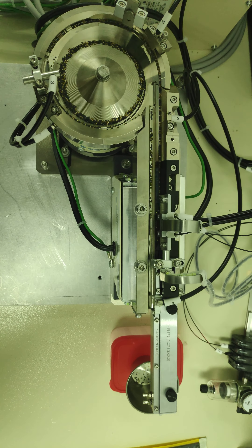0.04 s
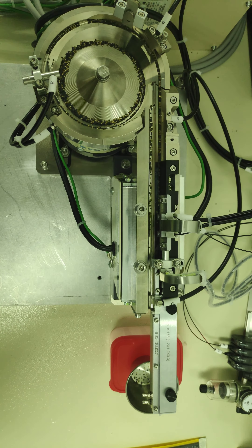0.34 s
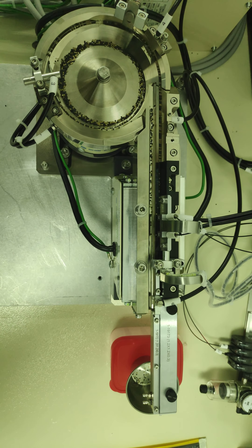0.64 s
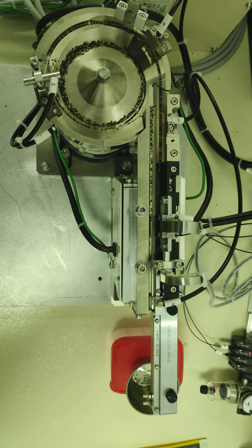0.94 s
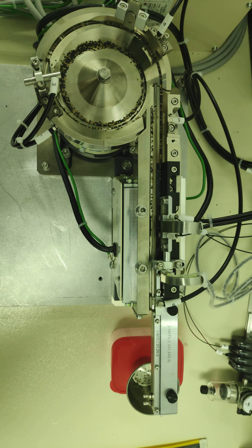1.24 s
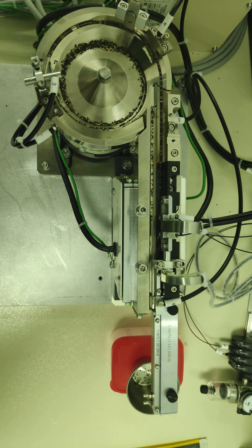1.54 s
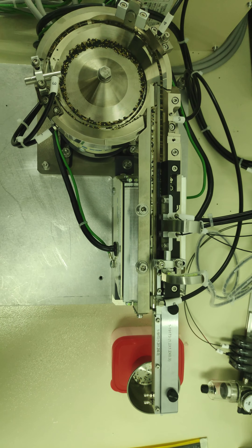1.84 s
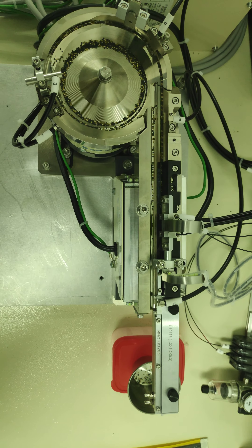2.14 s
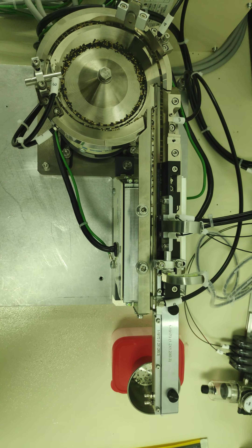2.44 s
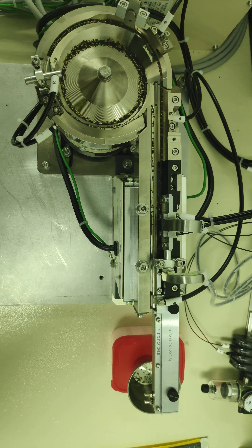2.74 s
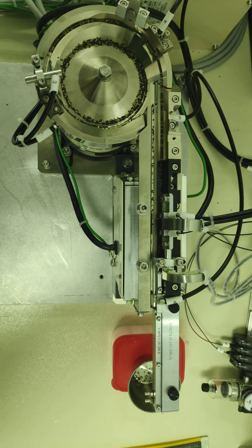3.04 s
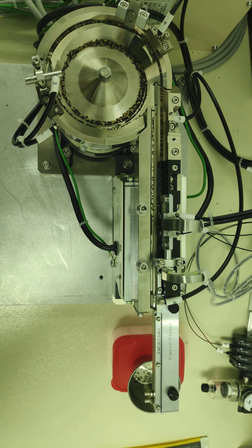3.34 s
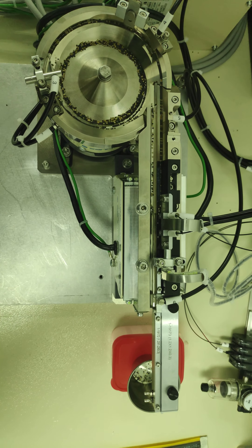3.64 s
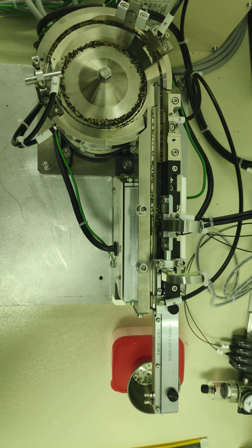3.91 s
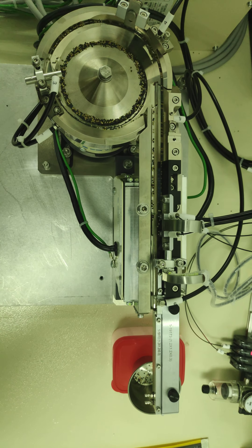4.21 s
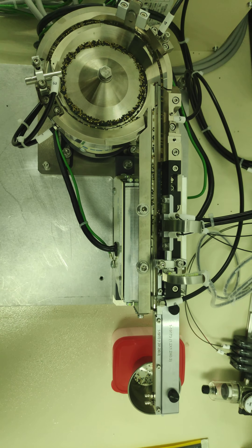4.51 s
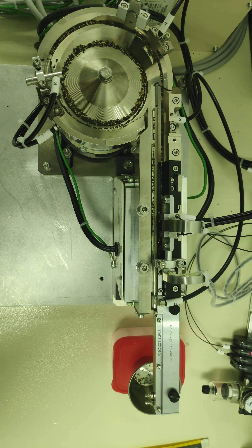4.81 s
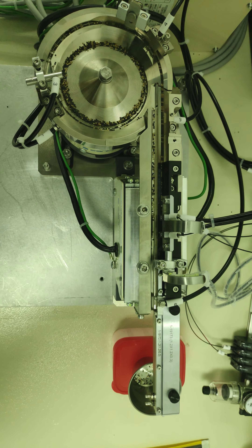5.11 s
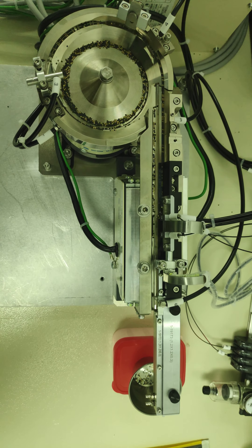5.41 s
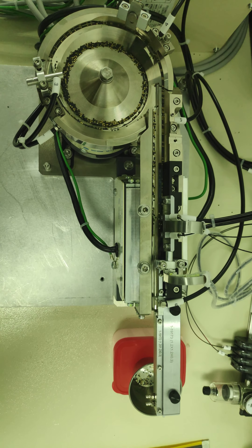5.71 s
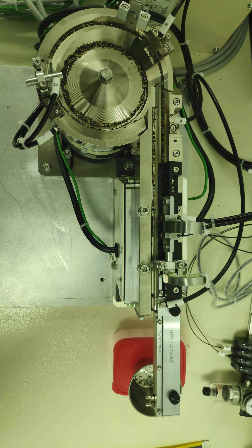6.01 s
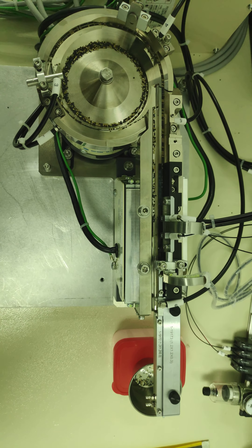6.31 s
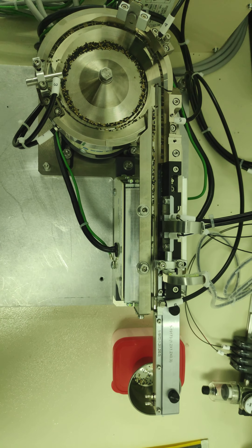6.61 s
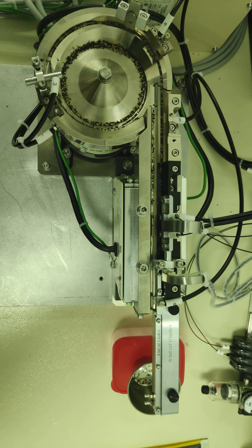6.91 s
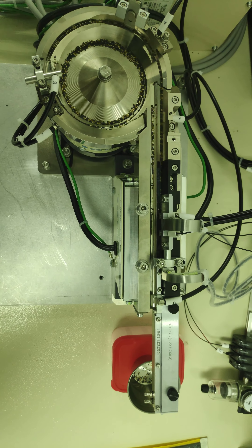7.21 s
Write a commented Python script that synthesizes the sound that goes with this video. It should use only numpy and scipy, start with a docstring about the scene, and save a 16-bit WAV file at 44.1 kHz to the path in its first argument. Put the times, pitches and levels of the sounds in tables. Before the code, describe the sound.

Irregular sharp clicks and short air puffs from a sorting valve, over the steady hiss and hum of a factory bowl feeder.

```python
"""Bowl feeder with sorting jet

A vibratory bowl and its straight track hum over factory rumble while air and tiny sliding parts hiss.
Now and then a sorting jet fires: a short puff of air, then the knock and bounce of its valve closing,
and a brief ringing hiss around the machine. Heard from close above."""
import sys
import numpy as np
from scipy import signal
from scipy.fft import rfft, irfft
from scipy.io import wavfile
from scipy.ndimage import uniform_filter1d

SR = 44100
rng = np.random.default_rng(int(sys.argv[2]) if len(sys.argv) > 2 else 0)


def file_out(sig):
    """Save sig as 16-bit WAV at sys.argv[1]."""
    # one column per channel
    cols = np.atleast_2d(sig).T
    # limit, then scale
    lim = np.clip(cols, -1, 1)
    pcm = np.round(lim * 32767).astype(np.int16)
    wavfile.write(sys.argv[1], SR, pcm)


N = 320166
BINS_HZ = np.fft.rfftfreq(N, 1 / SR)
BOWL_HZ, TRACK_HZ, MAINS_HZ = 154, 233, 60


def from_db(db):
    return 10 ** (np.asarray(db) / 20)


def spectrum_db(points):
    """A table's level columns, interpolated over log frequency."""
    hz, *columns = np.transpose(points)
    return np.array([np.interp(np.log(BINS_HZ + 1), np.log(hz + 1), db) for db in columns])


def colour(x, gain_db):
    """Minimum-phase filter: nothing rings before its cause."""
    cepstrum = irfft(np.log(from_db(gain_db)), N)
    causal_fold = 1 + np.sign(N / 2 - np.arange(N)) * (np.arange(N) > 0)
    return irfft(rfft(x) * np.exp(rfft(cepstrum * causal_fold)), N)


def drift(rate_hz):
    """Random wander between unit-variance knots."""
    knots = rng.standard_normal(400)
    return np.interp(np.arange(N) / SR * rate_hz, np.arange(400), knots / knots.std())


def ripple(depth_db):
    """Crowded weak resonances of the metalwork: fine spectral ripple, different at each ear."""
    bumps = uniform_filter1d(rng.standard_normal((2, len(BINS_HZ))), size=200, axis=1)
    return depth_db * bumps / bumps.std()


def add(mix, start_s, sound):
    part = mix[:, max(round(start_s * SR), 0):][:, :sound.shape[1]]
    part += sound[:, :part.shape[1]]


def room(x, t60_s, wet_db):
    """Direct sound plus decaying scattered reflections, different at each ear."""
    t = np.arange(SR // 2) / SR
    build_up = 1 - np.exp(-t / 0.009)
    taps = rng.standard_normal((2, len(t))) * from_db(-60 * t / t60_s) * build_up
    taps /= np.linalg.norm(taps, axis=1, keepdims=True)
    return x + from_db(wet_db) * signal.fftconvolve(x, taps, axes=1)[:, :N]


# Factory noise spectrum: (frequency [Hz], gain [dB])
RUMBLE_SPECTRUM = [(10, -31), (24, -26), (33, -29), (45, -24), (58, -31.5), (77, -23), (92, -29),
                   (108, -23), (125, -28.5), (260, -36), (350, -34.5), (460, -36.5), (550, -47.5),
                   (1000, -57)]
def rumble():
    """Low machinery noise, alike at both ears."""
    return colour(rng.standard_normal((1, N)), spectrum_db(RUMBLE_SPECTRUM))


# Drive and mains harmonics: (order, left [dB], right [dB])
BOWL_HARMONICS = [(1, -37, -39.5), (2, -41, -42)]
TRACK_HARMONICS = [(1, -49.5, -42.5), (2, -62.5, -65)]
MAINS_HARMONICS = [(3, -34.5, -32.5), (6, -65, -67), (21, -64.5, -75)]
def hum(drive_hz, harmonics, waver=0.012):
    """A drive shakes its metal at a fixed rate; phase and level waver slightly."""
    cycles = drive_hz * np.arange(N) / SR + 0.00075 * drift(2.2)
    tone = sum(from_db([[left_db], [right_db]]) * np.sin(2 * np.pi * (order * cycles + rng.random()))
               for order, left_db, right_db in harmonics)
    return np.sqrt(2) * tone * (1 + waver * drift(4.3))


# Steady hiss spectrum: (frequency [Hz], left [dB], right [dB])
HISS_SPECTRUM = [(750, -38.5, -38), (1440, -47, -44), (2250, -44.5, -46), (2850, -39.5, -47.5),
                 (3470, -42.5, -47), (4700, -42.5, -44.5), (5120, -32.5, -32.5), (6270, -32.5, -31),
                 (7260, -38.5, -31.7), (9250, -37.5, -35.5), (10200, -34.5, -39.5), (10900, -35.5, -39.5),
                 (12900, -31.5, -47), (15300, -34.5, -45)]
# Narrow resonances: (frequency [Hz], width [Hz], lift [dB])
HISS_RESONANCES = [(1636, 26, 11.5), (5850, 50, 1), (6070, 47, 6), (6220, 46, -2), (10800, 120, 7)]
def feeder_hiss(gain_db=-0.77, flutter=0.021, swell_db=0.6, bass_cut_hz=280, ripple_db=2.5):
    """Air and sliding parts hiss among metal resonances, pulsing slightly with the bowl."""
    t = np.arange(N) / SR
    peaks_db = sum(lift_db / (1 + (2 * (BINS_HZ - hz) / width_hz) ** 2)
                   for hz, width_hz, lift_db in HISS_RESONANCES)
    bass_loss_db = 10 * np.log10(1 + bass_cut_hz / (BINS_HZ + 10))  # small parts radiate little bass
    shape_db = spectrum_db(HISS_SPECTRUM) + peaks_db - bass_loss_db
    pulsing = 1 + flutter * np.sin(2 * np.pi * BOWL_HZ * t)
    flow = pulsing * from_db(gain_db + swell_db * drift(11))
    return colour(rng.standard_normal((2, N)) * flow, shape_db + ripple(ripple_db))


# Lingering hiss spectrum: (frequency [Hz], left [dB], right [dB])
AFTER_HISS_SPECTRUM = [(100, -45, -40), (567, -37, -38), (1410, -41.5, -43.5), (2600, -44, -53),
                       (3510, -34, -41.5), (4400, -26, -32), (4580, -33.5, -33), (5260, -33.5, -43),
                       (7000, -45.5, -38), (9600, -37.5, -41), (14900, -36, -47)]
def after_hiss(shots, gain_db=-1.9, rise_s=0.0015, hold_s=0.047, t60_s=0.35, flicker_db=2.5):
    """A ringing hiss lingers after each shot, flickers and dies away."""
    t, air = np.arange(SR // 3) / SR, np.zeros((2, N))
    rise = 1 - np.exp(-(t / rise_s) ** 2)
    decay = from_db(-60 * np.maximum(t - hold_s, 0) / t60_s)
    for start_s, _ in shots:
        add(air, start_s, from_db(gain_db) * rise * decay * rng.standard_normal((2, len(t))))
    shape_db = spectrum_db(AFTER_HISS_SPECTRUM) + ripple(depth_db=2.0)
    return colour(air * from_db(flicker_db * drift(50)), shape_db)


# Valve and bracket modes: (frequency [Hz], left [dB], right [dB])
BRACKET_MODES = [(425, -21, -25), (596, -38, -53), (607, -25.5, -20), (698, -26.5, -28), (914, -35, -29.5),
                 (1046, -42, -32), (1253, -22.5, -28.5), (1766, -51, -45), (1840, -34, -18),
                 (2023, -25, -25.5), (2272, -23.5, -29), (2750, -41, -54), (3230, -39, -48),
                 (3480, -27, -45), (3680, -45, -16.5), (3960, -31, -20.5), (4155, -14, -25),
                 (4390, -18, -23), (4660, -20, -20.5)]
def valve_knocks(shots, ring_gain_db=-16.0, t60_s=0.028, scatter_s=0.00062, bounce_s=0.011,
                 bounce_db=-10.0, tick_db=-31, tick_s=0.0049, blow_db=-30, blow_s=0.0001):
    """The plunger hits its seat, rings the bracket and bounces once."""
    t, knocks = np.arange(3000) / SR, np.zeros((2, N))
    hz, *ears_db = np.transpose(BRACKET_MODES)
    ear_gains = from_db(np.array(ears_db) + ring_gain_db)
    # high modes sound from slightly different places on the bracket
    lag_s = scatter_s * rng.random(len(hz)) * (hz > 2400)
    age_s = t - lag_s[:, None]
    decay = (age_s > 0) * from_db(-60 * age_s / t60_s)
    blow = from_db(blow_db) * (t / blow_s) * (2 - t / blow_s) * np.exp(1 - t / blow_s)
    tick_band = signal.butter(2, [4500, 8000], "band", fs=SR, output="sos")
    tick_envelope = from_db(tick_db) * np.exp(-t / tick_s)
    for start_s, open_s in shots:
        for delay_s, landing_db in ((0, 0), (bounce_s, bounce_db)):
            detune, strength = rng.standard_normal((2, len(hz), 1))
            modes = decay * np.sin(2 * np.pi * hz[:, None] * (1 + 0.015 * detune) * age_s)
            ring = ear_gains @ (modes * from_db(0.97 * strength))
            tick = tick_envelope * signal.sosfilt(tick_band, rng.standard_normal((2, len(t))))
            add(knocks, start_s + open_s + delay_s, from_db(landing_db) * (blow + ring + tick))
    return room(knocks, t60_s=0.077, wet_db=-9.0)


# Air puff spectrum: (frequency [Hz], left [dB], right [dB])
PUFF_SPECTRUM = [(100, -62, -55), (500, -39, -27.5), (1700, -44, -41), (2780, -31, -40), (4300, -26, -22.5),
                 (4980, -36, -29.5), (7820, -26, -19), (8800, -32, -13.5), (9240, -24, -25.5),
                 (9600, -17.5, -21.5), (11220, -18, -23), (12000, -23.5, -43), (14100, -22.5, -26),
                 (15300, -15, -37)]
def air_puffs(shots, gain_db=6.5, rise_s=0.00015, sag_s=0.0032, length_s=0.0041, fall_s=0.0024,
              echo_s=0.0017, echo_db=-8):
    """A puff swells as the valve opens, sags with the pressure and cuts off; nearby metal echoes it."""
    t, air = np.arange(600) / SR, np.zeros((2, N))
    opening = 1 - np.exp(-t / rise_s)
    pressure = np.exp(-t / sag_s)
    cutoff = (1 - np.tanh((t - length_s) / fall_s)) / 2
    for start_s, _ in shots:
        puff = from_db(gain_db) * opening * pressure * cutoff * rng.standard_normal((2, len(t)))
        add(air, start_s - rise_s, puff)
        add(air, start_s + echo_s, from_db(echo_db) * puff)
    return room(colour(air, spectrum_db(PUFF_SPECTRUM)), t60_s=0.049, wet_db=-8.5)


# Jet firings: (time [s], valve open time [s])
JET_SHOTS = [(0.0723, 0.012), (0.5074, 0.011), (0.6056, 0.011), (0.9559, 0.014), (1.0346, 0.0107),
             (1.2211, 0.01), (1.3892, 0.0096), (1.43, 0.011), (1.6625, 0.01), (1.7672, 0.012),
             (1.8373, 0.0103), (1.9756, 0.0117), (2.52, 0.011), (2.669, 0.01), (3.0005, 0.0116),
             (3.135, 0.011), (3.2275, 0.0103), (3.4672, 0.011), (3.6374, 0.0098), (3.6878, 0.011),
             (3.7864, 0.01), (3.8588, 0.0102), (4.1355, 0.011), (4.2104, 0.013), (4.267, 0.0117),
             (4.702, 0.012), (4.857, 0.012), (4.9163, 0.01), (5.02, 0.011), (5.118, 0.0109),
             (5.2664, 0.0107), (5.3836, 0.0099), (5.708, 0.011), (5.8505, 0.0105), (5.9865, 0.01),
             (6.0456, 0.01), (6.235, 0.013), (6.274, 0.013), (6.312, 0.011), (6.3516, 0.011),
             (6.4673, 0.0094), (6.5774, 0.011), (6.6556, 0.01), (6.714, 0.011), (6.8241, 0.012),
             (7.2348, 0.012)]
def sorting_jet():
    """Every shot fires at the same air pressure, so all are equally strong."""
    return air_puffs(JET_SHOTS) + after_hiss(JET_SHOTS) + valve_knocks(JET_SHOTS)


def scene():
    drives = hum(BOWL_HZ, BOWL_HARMONICS) + hum(TRACK_HZ, TRACK_HARMONICS)
    mains = hum(MAINS_HZ, MAINS_HARMONICS)
    return drives + mains + rumble() + feeder_hiss() + sorting_jet()


def record(dry):
    """Steep low-pass."""
    cutoff_hz = 15800
    taps = signal.firwin(301, cutoff_hz, window=("kaiser", 9), fs=SR)
    return signal.oaconvolve(dry, taps[None], "same", axes=1)


dry = scene()
out = record(dry)
file_out(out)
```